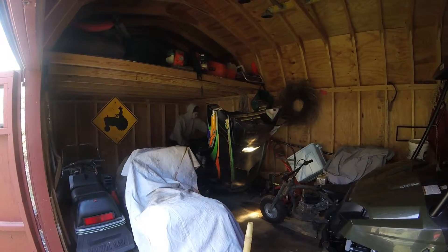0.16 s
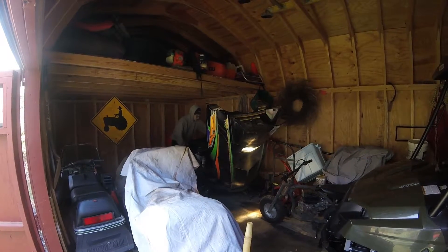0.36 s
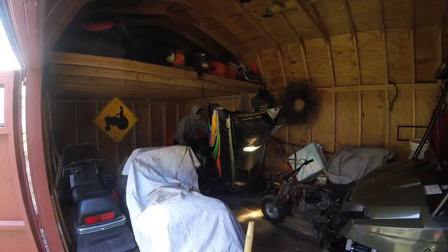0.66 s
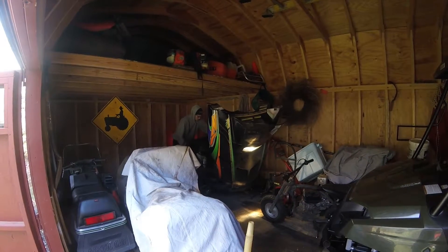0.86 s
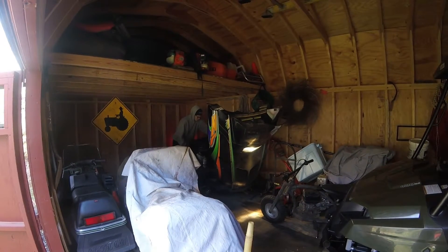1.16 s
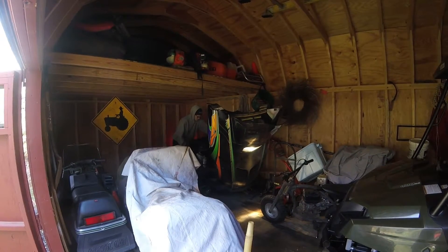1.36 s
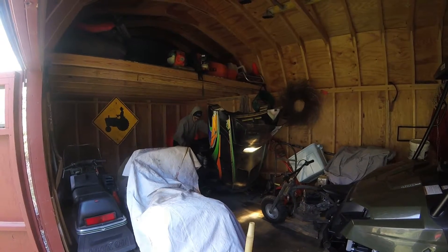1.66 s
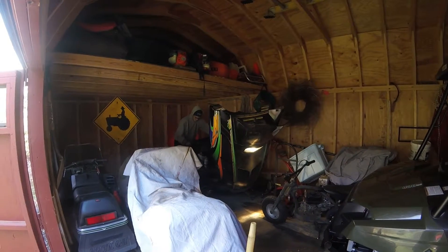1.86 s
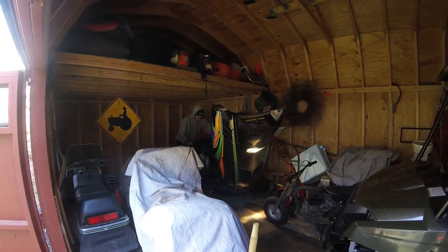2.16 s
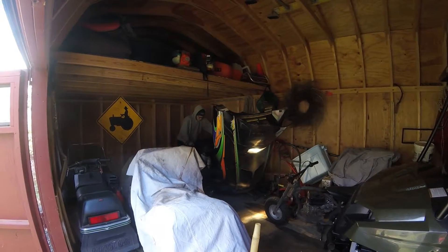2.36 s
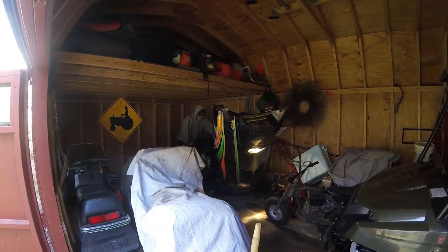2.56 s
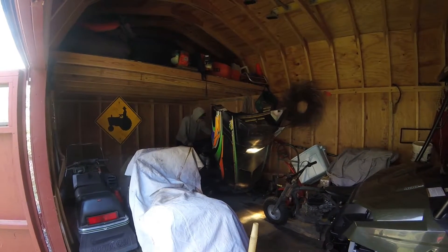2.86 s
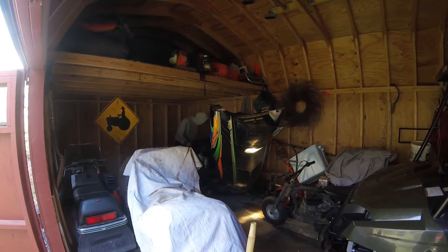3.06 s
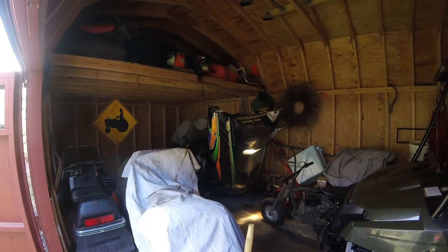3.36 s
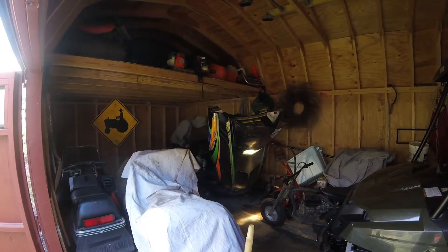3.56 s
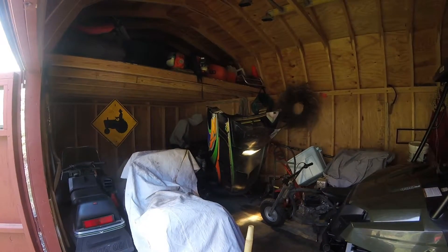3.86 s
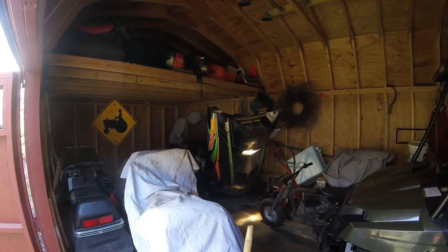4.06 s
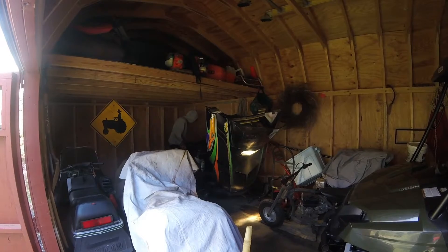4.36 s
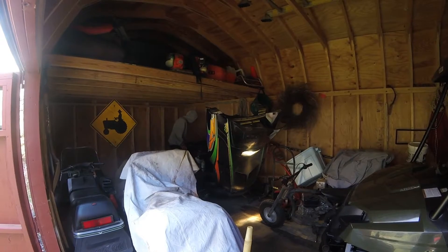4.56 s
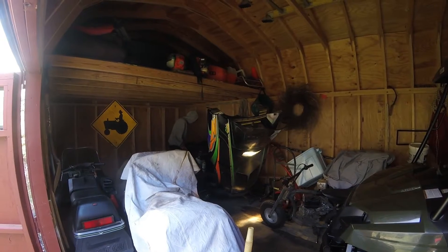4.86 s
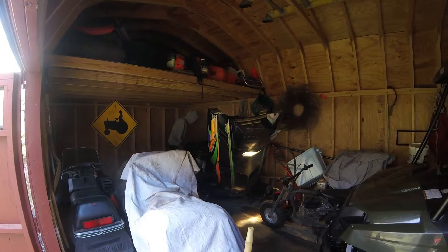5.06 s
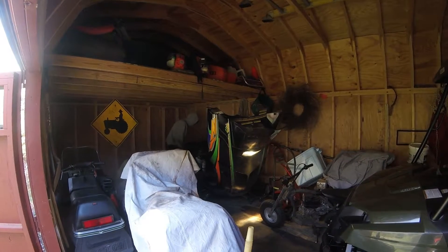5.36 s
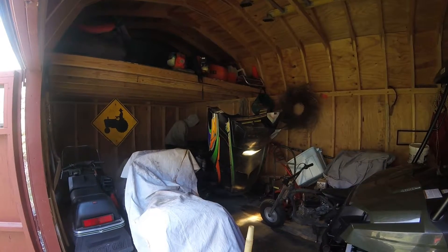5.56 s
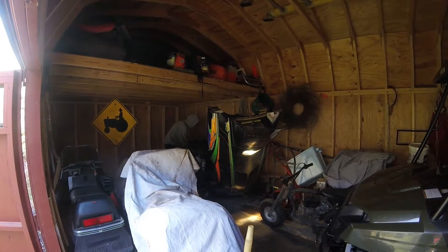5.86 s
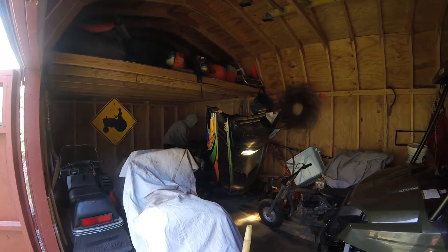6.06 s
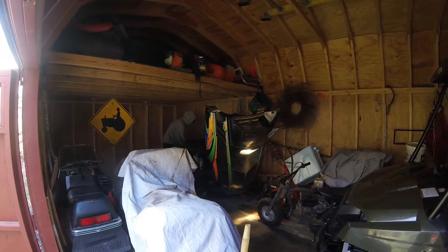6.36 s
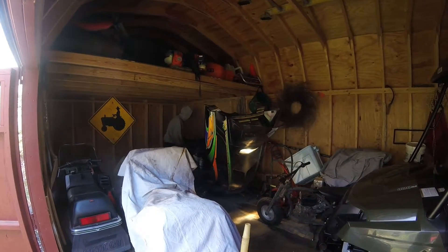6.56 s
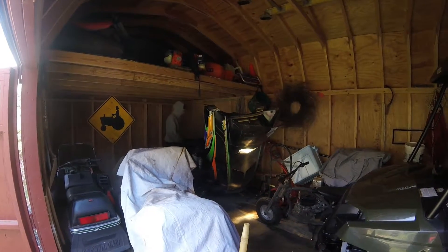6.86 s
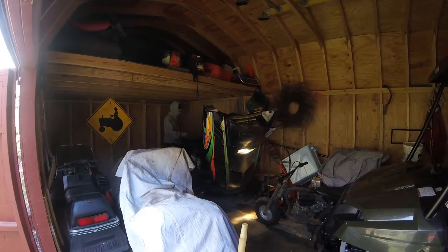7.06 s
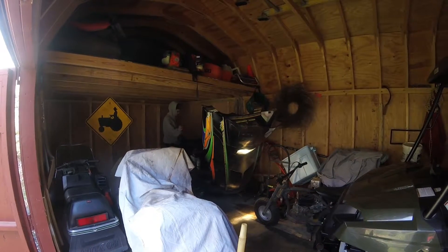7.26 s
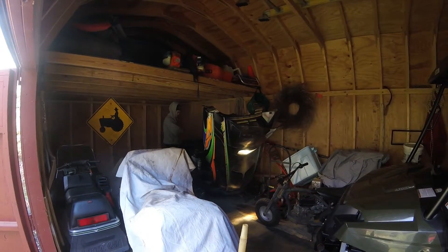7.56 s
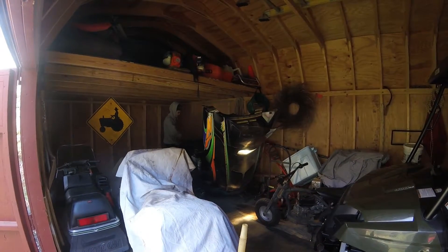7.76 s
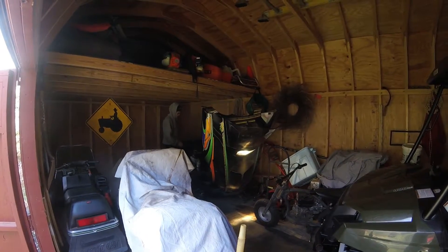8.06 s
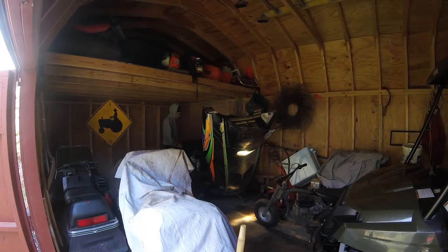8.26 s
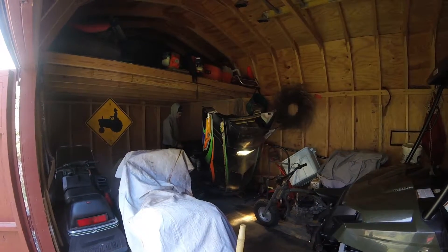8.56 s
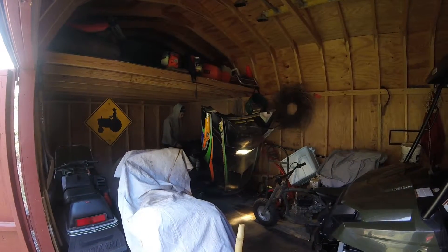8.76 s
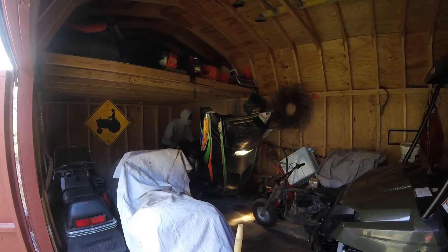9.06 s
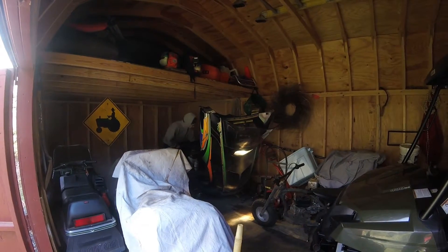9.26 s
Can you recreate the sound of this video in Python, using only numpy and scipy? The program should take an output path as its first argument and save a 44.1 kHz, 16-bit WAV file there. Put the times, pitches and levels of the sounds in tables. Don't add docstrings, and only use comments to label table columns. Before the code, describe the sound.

A cold two-stroke snowmobile engine is already idling at 0 s and runs throughout, about 9.4 s, at the far end of a wooden shed with the microphone at the door. Firings are irregular, roughly seven to nine a second: each gives a raspy bark, a short gush of gas hiss, a faint high chirp and, moments later, a hollow mid-pitched ring from the exhaust pipe. Underneath are a low pumping hum, rattling panels and a steady whirr. At about 0.7 s and 1.2 s two dull, juddering shoves land on the plastic hood, the second firmer, while the idle quickens slightly until 1.4 s. From 3 to 6 s the popping stays uneven, with a thin, clear pipe tone coming and going. From 6 s firings are a little more spaced and the air-box boom grows. Around 8.6 s the pace lifts briefly, then settles; the engine is still running at the end.

```python
import sys
import numpy as np
from scipy import signal
from scipy.fft import rfft, irfft
from scipy.io import wavfile
from scipy.ndimage import uniform_filter1d

SR = 44100
rng = np.random.default_rng(int(sys.argv[2]) if len(sys.argv) > 2 else 0)


def to_wav(s):
    ch = np.atleast_2d(s).T
    pcm = np.round(np.clip(ch, -1, 1) * 32767)
    wavfile.write(sys.argv[1], SR, pcm.astype(np.int16))


def voltage_ratio(decibels):
    exponent = np.asarray(decibels, float) / 20
    return 10 ** exponent


N = 415863
T = np.arange(N) / SR
HZ = np.fft.rfftfreq(16384, 1 / SR)


def evened(x):
    return x / np.sqrt(np.mean(x ** 2) + 1e-20)


def columns(rows):
    s, *values = np.transpose(rows)
    return [np.interp(T, s, v) for v in values]


def smooth(points):
    f, db = np.transpose(points)
    return voltage_ratio(np.interp(np.log(HZ + 1), np.log(f + 1), db, -90, -90))


def rings(modes, steep=1.654):
    power = 0
    for hz, width, db in modes:
        power = power + voltage_ratio(2 * db) / (1 + (2 * (HZ - hz) / width) ** 2) ** steep
    return np.sqrt(power)


def colour(x, gain):
    log_gain = np.log(np.maximum(np.r_[gain, gain[-2:0:-1]], 1e-5))
    minimum_phase = np.exp(np.conj(signal.hilbert(log_gain)))
    taps = np.fft.ifft(minimum_phase).real[:len(HZ)]
    run_up = np.r_[x[-len(HZ):], x]
    return signal.oaconvolve(run_up, taps)[len(HZ):][:N]


def drift(per_s):
    f = np.fft.rfftfreq(N, 1 / SR)
    return evened(irfft(rfft(rng.standard_normal(N)) / (1 + (f / per_s) ** 4), N))


def wavering(hz, wobble, per_s, flutter_db):
    turns = np.cumsum(hz * (1 + wobble * drift(per_s))) / SR
    return np.sqrt(2) * voltage_ratio(flutter_db * drift(per_s)) * np.sin(2 * np.pi * turns)


def held(rows, rise_s, fall_s):
    envelope = np.zeros(N)
    for s, hold, db in rows:
        rise = (T - s) / rise_s + 1
        fall = (s + hold - T) / fall_s + 1
        envelope += voltage_ratio(db) * np.clip(np.minimum(rise, fall), 0, 1)
    return envelope


def gusts(s, db, lead_s, rise_s, t60):
    train = np.zeros(N)
    np.add.at(train, np.clip(((s - lead_s) * SR).astype(int), 0, N - 1), voltage_ratio(2 * db))
    t = np.arange(SR // 2) / SR
    shape = (1 - np.exp(-t / rise_s)) ** 2 * voltage_ratio(-120 * (t / t60) ** 1.5)
    return np.sqrt(abs(signal.oaconvolve(train, shape / shape.max())[:N]))


# t/s, piston strokes f/Hz, load level/dB
IDLE_PACE = [(0, 69.22, 4.5), (.5, 69.5, -0.5), (.71, 70.54, 2.5), (.83, 75.64, 1.5), (1.29, 75.87, -0.5),
             (1.42, 68.6, -2), (1.9, 70.4, -1), (2.55, 71.64, 0), (2.9, 69.73, 1), (3.9, 70.14, -1),
             (4.5, 69.45, 1.5), (5.2, 70.03, -3), (5.9, 68.67, 0.5), (6.9, 69, 1.5), (7.5, 67.7, 1.5),
             (8.3, 68.96, 2.5), (8.6, 72.52, 2.5), (9.43, 68.5, 2.5)]


def idle():
    return columns(IDLE_PACE)


# t/s, gas rush level/dB, chamber ring level/dB, lag of the ring t/ms
COLD_FIRINGS = [(0.004, -33, -16, 10), (0.061, -23.5, -13, 19.0), (0.194, -22, -12.5, 33),
                (0.36, -22.5, -12, 20.0), (0.476, -26.5, -14, 34.0), (0.634, -25.5, -14, 17.6),
                (0.71, -32, -20, 10), (0.748, -24, -15, 22), (0.886, -27.5, -15, 15),
                (0.981, -30.5, -19, 9.4), (1.039, -31, -24, 17), (1.171, -28, -21, 32.3),
                (1.243, -22.5, -20, 22.0), (1.378, -27.5, -18, 46), (1.476, -29.5, -18, 8.9),
                (1.566, -29.5, -13.5, 14.0), (1.659, -26.5, -14, 19.7), (1.784, -25.5, -21, 24),
                (1.892, -27, -16, 21.4), (2.01, -27, -17, 19.0), (2.116, -25, -13, 28.0),
                (2.268, -24.5, -18, 31.0), (2.396, -24, -16.0, 31.3), (2.529, -26, -13, 33),
                (2.645, -25.5, -14, 10.2), (2.753, -27, -31, 37), (2.845, -25, -15, 32.3),
                (2.955, -27, -29, 36.3), (3.001, -27.0, -30, 33.0), (3.071, -24.5, -19.5, 42.3)]
WARMING_FIRINGS = [(3.145, -26.5, -15, 29), (3.192, -25.5, -17.5, 12.3), (3.286, -25, -15, 19.0),
                   (3.355, -26.5, -14.5, 17.4), (3.43, -22.5, -13.5, 17.0), (3.578, -19, -20, 18.7),
                   (3.705, -25, -14, 32), (3.82, -30, -20, 8.0), (3.881, -25.5, -15.5, 18.7),
                   (4.02, -25, -14.5, 20.0), (4.097, -27.0, -16, 10.6), (4.162, -28, -14, 13),
                   (4.209, -28.5, -17.0, 14.4), (4.322, -26, -31, 19.0), (4.408, -24, -15, 34.5),
                   (4.517, -23.0, -19.5, 23.0), (4.657, -22, -17, 38.0), (4.803, -21.5, -13.5, 20.0),
                   (4.942, -25.5, -14.5, 24), (5.048, -26.5, -17, 11.7), (5.145, -23, -16, 33.7),
                   (5.268, -25, -12.5, 36), (5.386, -26.5, -23, 8.0), (5.452, -24, -16.5, 19.2),
                   (5.594, -25, -21.0, 45.0), (5.748, -21, -28, 21.6), (5.874, -22.5, -15, 24),
                   (5.985, -24.5, -19, 17.5)]
WARM_FIRINGS = [(6.076, -28, -21, 25.7), (6.145, -23, -18, 47.5), (6.281, -23.5, -21.5, 24.6),
                (6.369, -25.5, -18, 38.7), (6.446, -25.5, -12.5, 31.5), (6.492, -30, -15, 10.2),
                (6.591, -22, -17, 21.4), (6.716, -23.5, -10.5, 35.0), (6.8, -27.5, -24, 22.3),
                (6.935, -22, -21.0, 55), (7.067, -22, -16, 35), (7.226, -23, -15, 23.4),
                (7.346, -23.5, -19, 32.0), (7.466, -22, -15.5, 32.5), (7.613, -23.5, -22, 18),
                (7.762, -20, -15, 26.5), (7.906, -21, -18, 36.5), (8.018, -25.5, -22, 21),
                (8.055, -27, -17, 29), (8.202, -23, -24, 45.0), (8.349, -23.5, -21, 26.5),
                (8.46, -27.5, -15, 38.0), (8.558, -23, -20, 32.8), (8.723, -23, -16.5, 32),
                (8.863, -21.5, -19, 19.0), (9.029, -21.5, -17, 17.6), (9.176, -19.5, -15.5, 30.7),
                (9.318, -22.5, -13.5, 18.4)]


def firings():
    return np.transpose(COLD_FIRINGS + WARMING_FIRINGS + WARM_FIRINGS)


def firing_swell(lead_s, rise_s, t60, rest_db):
    s, rush_db = firings()[:2]
    return evened(np.hypot(gusts(s, rush_db, lead_s, rise_s, t60), voltage_ratio(rest_db)))


def strokes(jitter, spread_db, breath):
    turns = np.cumsum(idle()[0] * (1 + jitter * drift(30.))) / SR
    unevenness = voltage_ratio(np.clip(spread_db, 0, 4) * rng.uniform(-1.7, 1.7, N))
    pulses = np.diff(np.floor(turns), prepend=0) * unevenness
    breath = np.clip(breath, 0, 1)
    return np.sqrt(1 - breath) * evened(pulses) + np.sqrt(breath) * rng.standard_normal(N)


# start t/s, hold t/s, level/dB
HOOD_SHOVES = [
    (0.739, 0.098, -23.5),
    (1.197, 0.0974, -21.5),
]
# f/Hz, level/dB per Hz
HOOD_THUD = [(60, -24), (110, -8.5), (170, -1), (300, -3), (400, -13), (520, -13.5), (2000, -26)]


def shoves():
    judder = rng.standard_normal(N) * voltage_ratio(1.5 * drift(65.0))
    rumble = colour(judder, smooth(HOOD_THUD))
    rumble /= np.sqrt(uniform_filter1d(rumble ** 2, SR // 25))
    return held(HOOD_SHOVES, rise_s=0.026, fall_s=0.055) * rumble


# t/s, f/Hz
AIR_BOX_BOOM = [
    (0, 138.1),
    (3.4, 138.7),
    (5, 133.7),
    (7.2, 136.6),
    (8.4, 130.7),
    (9.43, 134.6),
]


def pumping():
    stroke_hz, load_db = idle()
    hum = wavering(stroke_hz, wobble=0.0265, per_s=12.48, flutter_db=1.5)
    boom = wavering(columns(AIR_BOX_BOOM)[0], wobble=0.0358, per_s=12.1, flutter_db=2.0)
    racing_hz = np.maximum(stroke_hz - 69.5, 0)
    hum_db = -36.5 + 0.54 * load_db - 0.5 * racing_hz
    hum_db = hum_db - 0.2 * (T - 4)
    boom_db = -42 + 0.74 * T + 0.7 * load_db
    kick = firing_swell(lead_s=.002, rise_s=.015, t60=0.42, rest_db=-17.0)
    return kick * (voltage_ratio(hum_db) * hum + voltage_ratio(boom_db) * boom)


# f/Hz, width f/Hz, level/dB
LOW_PIPE_NOTES = [(332.5, 17.2, -2.8), (346.7, 40, -7), (382.6, 40, -6.5), (398, 17, -9), (415.8, 10, -8.5)]
# f/Hz, level/dB per Hz
ENGINE_BODY = [(14, -1), (22, -2), (32, -1), (48, -2), (110, -0.5), (250, -1), (300, -6), (470, -5),
               (540, -11), (800, -13), (1000, -13), (1500, -31.5)]
# f/Hz, width f/Hz, level/dB over the body spectrum
PANEL_RINGS = [(89, 13, -1), (169.6, 13, 2), (234, 5.8, 4.5), (266, 19, 2.5), (449, 9., 5), (455, 11, 3),
               (495.7, 28, 10.5), (518, 19, 7.5), (709, 42, 10.5), (880, 31, 9.5)]
# start t/s, length t/s, level/dB
LOCKED_SPELLS = [(0, .1, -32), (2.2, .25, -33.5), (2.75, 0.73, -30.5), (3.85, 0.39, -31), (4.5, 0.31, -40),
                 (5.55, .15, -35), (6.08, .45, -32.5), (6.85, 0.47, -33), (7.45, .5, -37), (8.0, 0.17, -32),
                 (8.7, .55, -28.5)]


def pipe():
    load_db = idle()[1]
    low = evened(colour(strokes(jitter=.08, spread_db=0.5, breath=0.31), rings(LOW_PIPE_NOTES)))
    body_gain = smooth(ENGINE_BODY) * np.hypot(1, rings(PANEL_RINGS))
    body = evened(colour(strokes(jitter=.1, spread_db=5.5, breath=0.72), body_gain))
    shaking = firing_swell(lead_s=.002, rise_s=0.012, t60=0.27, rest_db=-24.0)
    line = wavering(413., wobble=0.00316, per_s=8.06, flutter_db=0.9)
    line *= voltage_ratio(-42.5) + 0.64 * held(LOCKED_SPELLS, rise_s=0.092, fall_s=0.092)
    return shaking * (voltage_ratio(-29.5 + load_db) * low + voltage_ratio(-29.5) * body) + line


# f/Hz, width f/Hz, level/dB
CHAMBER_NOTES = [(595.6, 13.5, -3), (599.5, 7.2, -6), (614.3, 8.9, 1), (645, 7.9, -1.3), (656.6, 12.5, -3)]


def chamber():
    s, rush_db, ring_db, lag_ms = firings()
    luck = rng.standard_normal((len(s), 6)).T
    crest = s + lag_ms / 1000
    echo = crest + .07 + .025 * luck[0].clip(-1, 1)
    next_firing = np.r_[s[1:], np.inf]
    echo_db = np.where(echo < next_firing, -21. + 0.83 * luck[1], -120)

    lead = SR // 25
    t = np.arange(-lead, 2 * lead) / SR
    swell = np.exp(-.5 * (t / np.where(t < 0, .009, .017)) ** 2)
    waves = np.zeros(N + 8 * lead)
    levels_db = np.r_[ring_db - .6, echo_db]
    for at, db, detune, phase in zip(np.r_[crest, echo], levels_db, luck[2:4].ravel(), luck[4:].ravel()):
        start = round(at * SR)
        ring_hz = 634.6 + 11.7 * detune
        waves[start:start + len(t)] += voltage_ratio(db - 2.5) * swell * np.sin(2 * np.pi * (ring_hz * t + phase))

    humming = evened(colour(strokes(jitter=.12, spread_db=0.5, breath=0.64), rings(CHAMBER_NOTES)))
    fed = firing_swell(lead_s=0.004, rise_s=.012, t60=0.61, rest_db=-19.0)
    return waves[lead:][:N] + voltage_ratio(-28.0 + 0.45 * idle()[1]) * humming * fed


# f/Hz, level/dB per Hz
OUTLET_BARK = [(440, -28.5), (750, -2.5), (966, -6.5), (1410, -0.5), (1530, -2), (1660, -0.5), (1800, -1.5),
               (2400, -17), (3120, -40.5), (5280, -120)]
# f/Hz, width f/Hz, level/dB over the bark
OUTLET_NOTES = [(1077, 35, 6), (1175, 11, 7.5), (1387, 9.9, 2.5), (1452, 18, 3), (1638, 16, 5.5),
                (1694, 15.8, 10.5), (1900, 14, 1), (2640, 40., 18)]
# f/Hz, level/dB per Hz
GAS_RUSH = [(1180, -29), (2000, -1), (2640, 0), (3240, -1), (4250, -7.5), (5300, 2.8), (5750, 3),
            (6120, -4), (6450, 3.9), (7480, -7.5), (9360, -11.5), (9900, -17), (10250, -13), (10600, -35)]
# f/Hz, level/dB per Hz
GAS_FIZZ = [(10200, -16), (10600, -24), (11300, -30), (11650, -21.5), (12100, -36), (13100, -25),
            (13400, -25), (14000, -24)]
# f/Hz, width f/Hz, level/dB
CLUTCH_CHIRP = [(9440, 70., -.1), (9590, 60., -2.5)]


def rattling_air(rattle_db):
    return rng.standard_normal(N) * voltage_ratio(rattle_db * drift(150.))


def exhaust():
    s, rush_db = firings()[:2]
    whirr_db = -37 + 0.86 * idle()[1]

    bark_db = -28.5 + (rush_db + 24)
    bark_gain = smooth(OUTLET_BARK) * np.hypot(1, rings(OUTLET_NOTES))
    bark = evened(colour(rattling_air(.6), bark_gain))
    bark *= np.hypot(gusts(s, bark_db - 2.0, lead_s=0.0017, rise_s=0.0061, t60=0.23), voltage_ratio(whirr_db + 2.0))

    reflections = evened(uniform_filter1d(rng.standard_normal(len(HZ)), size=14))
    rush_gain = np.hypot(smooth(GAS_RUSH), smooth(GAS_FIZZ)) * voltage_ratio(1.3 * reflections)
    rush = evened(colour(rattling_air(.7), rush_gain))
    rush *= np.hypot(gusts(s, rush_db - 10.5, lead_s=.006, rise_s=.006, t60=.25), voltage_ratio(whirr_db - 4.))

    chirp_db = rush_db - 24. + 2.1 * rng.standard_normal(len(s))
    chirp = evened(colour(rattling_air(1.5), rings(CLUTCH_CHIRP)))
    chirp *= gusts(s, chirp_db - 3.0, lead_s=-0.0071, rise_s=0.0023, t60=0.18)
    return bark + rush + chirp


def scene():
    return (shoves() + pumping() + pipe() + chamber() + exhaust())[None]


# f/Hz, share of the time [0-1]
TREBLE_KEPT = [(9300, 1), (10000, .9), (10350, .85), (10700, .25), (11350, .06), (11700, .8), (12000, .15),
               (13100, .04), (13400, .13)]


def patchy_treble(x):
    hz, t, z = signal.stft(x, SR, nperseg=1024)
    band = np.arange(len(hz)) // 4
    luck = rng.standard_normal((len(t), band[-1] + 1))
    luck = evened(uniform_filter1d(luck, size=4, axis=0)).T
    treble_db = 10 * np.log10((abs(z[hz > 8e3]) ** 2).sum(0) + 1e-12)
    luck += .55 * evened(treble_db - treble_db.mean())
    luck += .3 * drift(6.)[np.minimum((t * SR).astype(int), N - 1)]
    rank = luck.argsort(1).argsort(1) / len(t)
    share = np.interp(hz, *np.transpose(TREBLE_KEPT))[:, None]
    return signal.istft(z * (rank[band] >= 1 - share), SR, nperseg=1024)[1][:N]


def roll_off(x):
    return signal.sosfilt(signal.butter(12, 13550, fs=SR, output="sos"), x)


def record(dry):
    mix = patchy_treble(dry[0])[None]
    return roll_off(mix)


dry = scene()
out = record(dry)
to_wav(out)
```